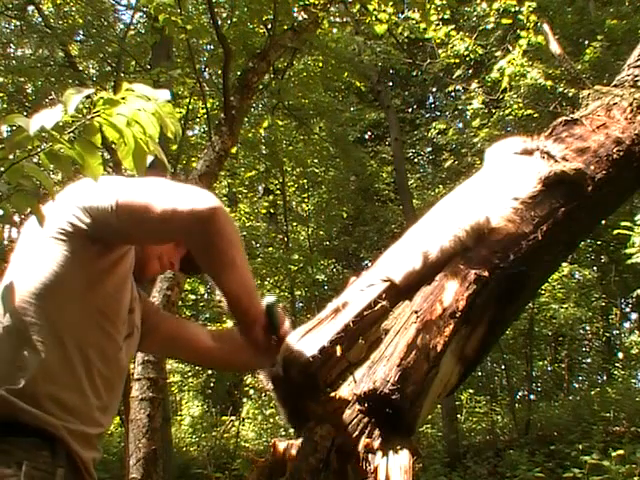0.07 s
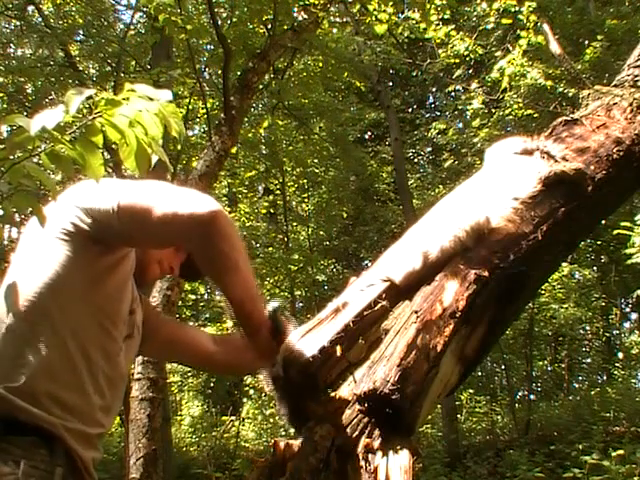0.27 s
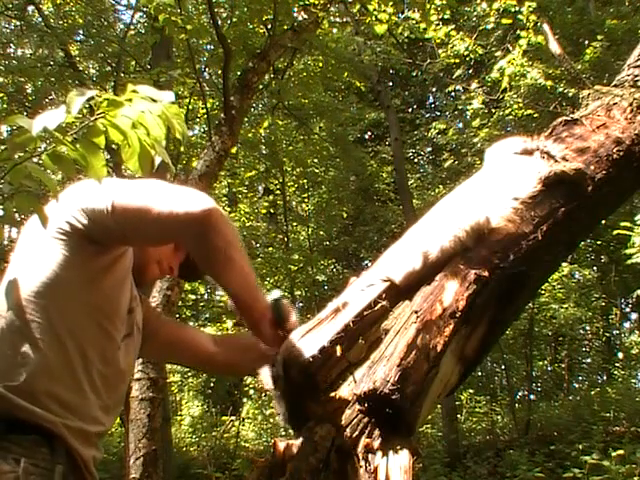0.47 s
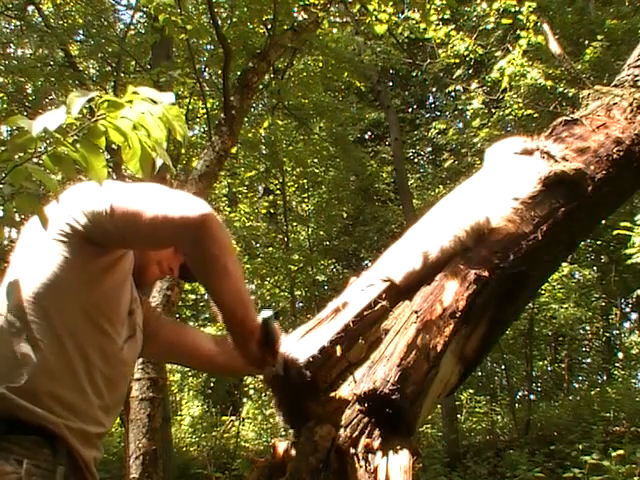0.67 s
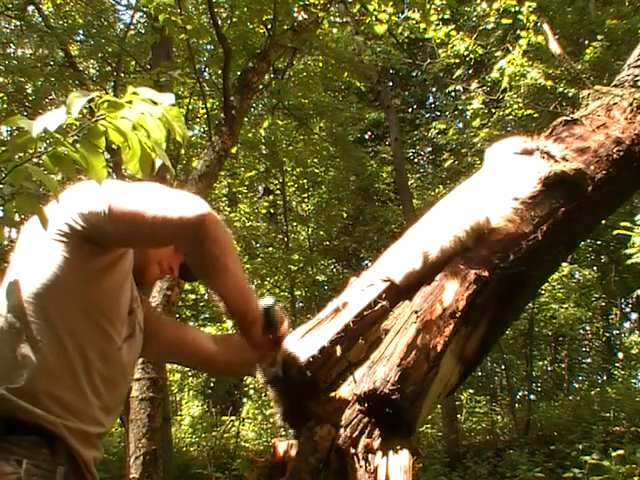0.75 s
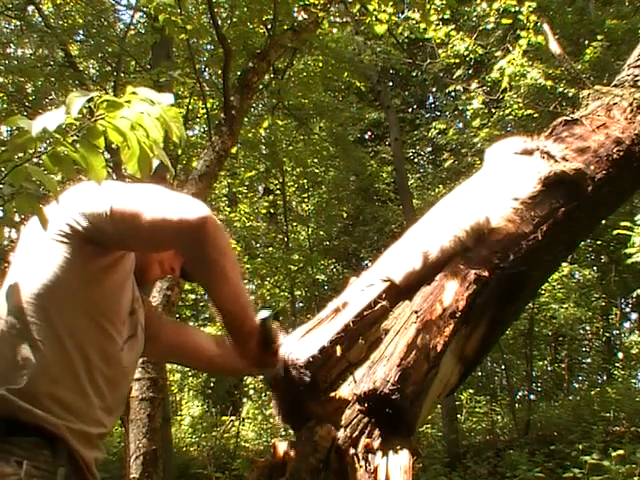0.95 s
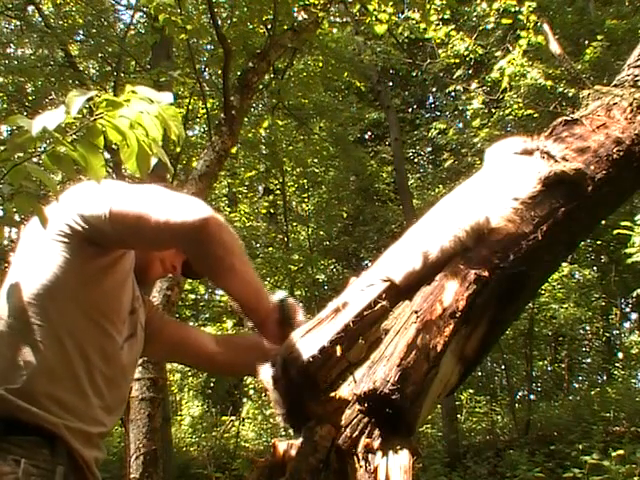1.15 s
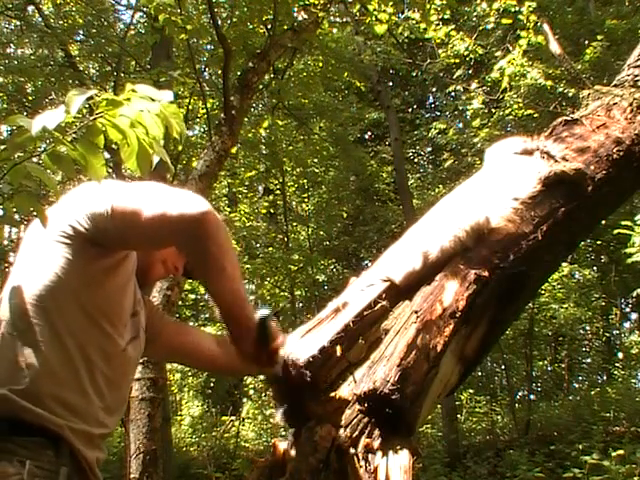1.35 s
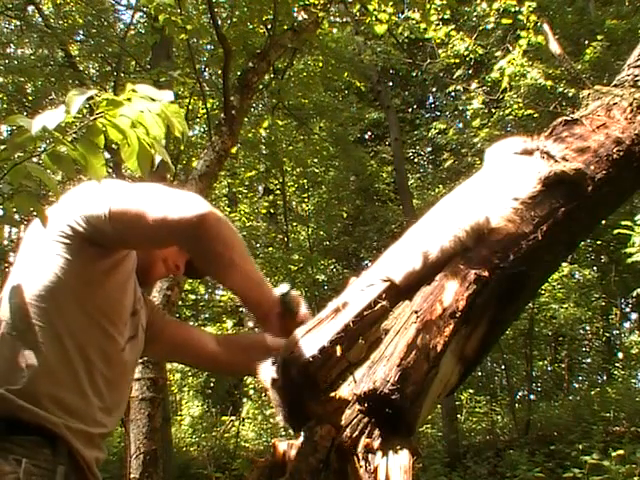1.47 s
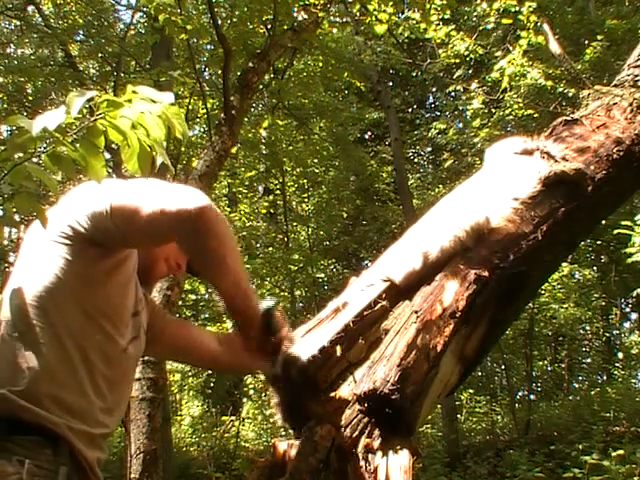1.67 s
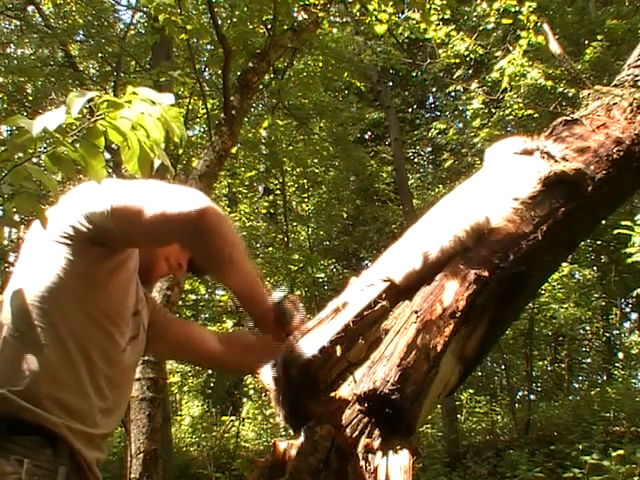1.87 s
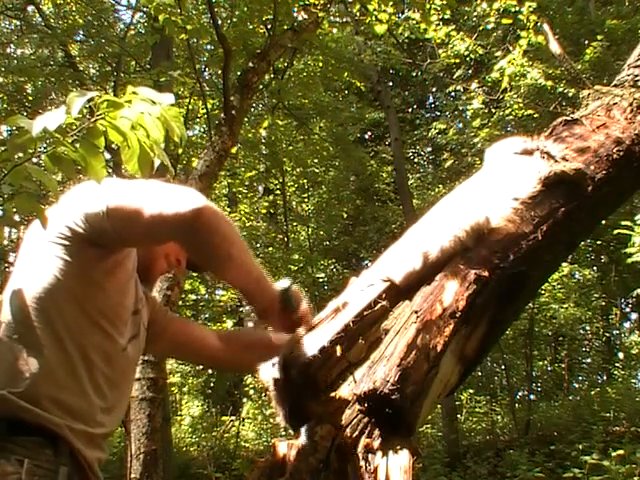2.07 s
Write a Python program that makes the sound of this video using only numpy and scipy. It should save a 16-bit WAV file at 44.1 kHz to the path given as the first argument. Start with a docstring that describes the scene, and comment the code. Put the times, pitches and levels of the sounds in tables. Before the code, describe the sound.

A knife scrapes a wet hide over a log, close by: gritty, hissing strokes of about 0.15 seconds at 0.17, 0.5, 0.8, 1.14, 1.45 and 1.78, with a seventh starting at 2.06. The fourth squeaks briefly near 1.18. A fly buzzes up around 0.45 and knocks the microphone sharply at 0.47, then faintly. A small bird chips throughout with blurred echo over soft forest and insect hiss.

```python
"""In a forest, a knife scrapes a wet hide over a log in seven short strokes, close to one small microphone.
Each stroke is a dense grain of random catches ringing log, hide and blade, plus a wet hiss; the fourth also squeaks.
A small bird chips overhead in arched harmonic tones with a blurred echo, and faint tones sound further off.
A fly buzzes up in wing-beat harmonics, whir and dry ticks, and taps the grille three times, the last faintly.
Leaves and far insects lie behind as a smooth shaped hiss."""
import sys
import numpy as np
from scipy import signal
from scipy.fft import rfft, irfft
from scipy.io import wavfile
from scipy.ndimage import uniform_filter1d

SR = 44100
rng = np.random.default_rng(int(sys.argv[2]) if len(sys.argv) > 2 else 0)


def pcm_store(signal):
    """Save signal as 16-bit PCM."""
    levels = np.round(np.clip(np.atleast_2d(signal), -1, 1) * 32767)
    wavfile.write(sys.argv[1], SR, levels.astype(np.int16).T)


def voltage_ratio(decibels):
    """Convert decibels (scalar or array-like) to amplitude ratios, 20 dB per decade."""
    exponent = np.asarray(decibels, float) / 20
    return 10 ** exponent


N = 92610
T = np.arange(N) / SR

# spectrum of the leaves and far insects: [pitch_hz, level_db per Hz]
FOREST_SPECTRUM = [(24, -62), (40, -15), (54, -31), (150, -20.5), (427, -6), (1020, -1.5), (2640, -8.5),
                   (5860, -8.5), (7160, -9.5), (11800, -13), (15500, -26.5)]
# faint soft tones from further off: [middle_s, length_s, pitch_hz, level_db]
FAR_TONES = [(1.065, 0.032, 800, -51.5), (1.8, 0.036, 5800, -60), (1.305, .03, 2600, -59.5)]
# bird chips: [middle_s, length_s, top_pitch_hz, level_db, second_partial_db]
BIRD_CHIPS = [(0.134, 0.043, 2505, -47.5, -6), (0.236, 0.034, 2470, -47, -7),
              (0.418, 0.044, 2516, -50.5, -1.5), (0.588, 0.038, 2430, -50, -1),
              (0.761, 0.038, 2500, -48, -5), (1.07, 0.038, 2410, -52.5, -2), (1.375, 0.049, 2383, -55, -3),
              (1.463, 0.042, 2440, -54, 1), (1.626, 0.05, 2467, -50.5, 0), (1.786, 0.036, 2288, -50, -6.5),
              (1.928, .04, 2180, -55.5, -1), (2.049, 0.03, 2290, -52, -0.5)]
# the other partials of every chip: [multiple, level_db]
CHIP_HARMONICS = [(1, -14.5), (3, -2.5), (4, -11.5), (5, -22)]
# path of the fly: [start_s, wing_beat_hz, buzz_db, wing_tick_db, tilt_db per multiple]
FLY_PATH = [(.25, 195, -97, -80, -8), (.274, 190.4, -67, -77, -6.5), (.326, 186.8, -66.5, -60, 0),
            (.394, 185.5, -66, -57, 2.93), (.414, 187.4, -56, -60, 1.2), (.434, 183, -43, -45, 0.5),
            (0.449, 186.5, -29, -38, 0.06), (0.459, 187.7, -33.5, -39.5, 0.6),
            (0.473, 191.9, -33, -40, -0.64), (0.483, 191.3, -46, -44, 0.8), (0.49, 197, -49, -61, -1.5),
            (0.501, 193, -57.5, -81, -3), (.508, 196, -92, -90, -7)]
# harmonics of the wing beat: [multiple, level_db]
WING_HARMONICS = [(1, -6.5), (2, 3), (3, 2.5), (4, -5), (5, -2.5), (6, -8.5), (7, -10), (8, -10.5),
                  (9, -17.5), (10, -18), (11, -25), (12, -25)]
# the fly hits the grille: [start_s, peak_db]
GRILLE_TAPS = [(0.4706, -9.5), (0.4752, -10), (0.4877, -23.5)]
# ringing modes of the grille: [pitch_hz, level_db, t60_s]
GRILLE_MODES = [(1480, -2, 0.001), (5060, -2.5, 0.00064), (7400, -4, 0.00062), (10570, -1, 0.0021),
                (13100, -8, .0015)]
# knife strokes, one list each: [start_s, log_ring_db, hide_ring_db, blade_ring_db, hiss_db]
KNIFE_STROKES = [
    [(0.17, -71, -75, -75, -59), (0.182, -55, -73, -64, -66), (0.196, -57, -55.5, -57, -53),
     (0.226, -43.5, -57, -51.5, -50), (0.242, -48.5, -57, -58, -50.5), (0.274, -54.5, -57, -59, -52),
     (0.304, -62, -63, -75, -57), (0.31, -60, -72, -65, -64)],
    [(0.495, -59, -61, -71, -65), (0.511, -55.5, -52, -66, -56), (0.517, -51.5, -56, -55, -61),
     (0.535, -46.5, -53.5, -55, -45.5), (0.573, -52.5, -50.5, -52, -49.5), (0.591, -59, -67, -64, -56),
     (0.611, -60, -63, -69, -59), (0.62, -58, -75, -74, -65)],
    [(0.8, -58, -66, -74, -63), (0.806, -64, -65, -75, -72), (0.842, -45.5, -66, -58, -58),
     (0.86, -51, -47, -52, -47), (0.926, -54, -52.5, -53.5, -46.5), (0.944, -68, -63, -78, -61),
     (0.952, -52, -75, -68, -71), (0.96, -57, -66, -64, -72)],
    [(1.14, -60, -65, -73, -74), (1.148, -54, -67, -75, -74), (1.166, -47.5, -46.5, -52, -50),
     (1.186, -47.5, -45, -49.5, -47.5), (1.244, -49, -49.5, -49, -44), (1.266, -66, -55, -57, -53),
     (1.286, -61, -61, -58, -73), (1.32, -66, -63, -61, -66)],
    [(1.45, -67, -74, -68, -72), (1.462, -57.5, -62, -70, -60), (1.492, -47, -54, -58, -63),
     (1.516, -48.5, -49, -52, -48), (1.536, -48.5, -64, -53, -54), (1.544, -53, -48, -51.5, -49),
     (1.562, -46.5, -53.5, -52.5, -52), (1.6, -71, -62, -64, -60)],
    [(1.775, -63, -75, -61, -61), (1.781, -66, -69, -61, -61), (1.797, -57.5, -45, -51, -57),
     (1.815, -46, -54, -53, -51), (1.877, -52.5, -50.5, -52.5, -49), (1.899, -66, -63, -60, -58),
     (1.913, -53.5, -65, -65, -65), (1.92, -64, -74, -66, -61)],
    [(2.06, -74, -73, -67, -64), (2.068, -59, -63, -72, -63), (2.078, -77, -72, -69, -67),
     (2.088, -53, -59, -59, -68), (2.1, -60, -57, -55, -66)],
]
# resonances of log, hide and blade: [pitch_hz, width_hz, level_db]
LOG_MODES = [(600, 100, -25.5), (1033, 270, 6.5), (1212, 420, 7)]
HIDE_MODES = [(1610, 340, 1), (2177, 500, 2.5)]
BLADE_MODES = [(3110, 630, 2.5), (3840, 1080, 1.5)]
# spectrum of the wet hiss: [pitch_hz, level_db per Hz]
HISS_SPECTRUM = [(2500, -34), (4000, -6.5), (5800, -5.5), (7700, -1.5), (10000, -5), (12800, -5),
                 (15500, -25)]
# the single squeak of the wet hide: [start_s, pitch_hz, level_db]
HIDE_SQUEAK = [(1.16, 1324, -56), (1.168, 1716, -50), (1.174, 2326, -51), (1.184, 2326, -44),
               (1.191, 2047, -43), (1.195, 1650, -45.5), (1.2, 1410, -77)]


def unit(x):
    """Scale to rms 1."""
    return x / np.sqrt(np.mean(x ** 2))


def colour(x, table):
    """Shape the spectrum through (Hz, dB) points on a log frequency axis, then scale to rms 1."""
    hz, db = np.array(table, float).T
    f = np.maximum(np.fft.rfftfreq(N, 1 / SR), 1)
    gain = voltage_ratio(np.interp(np.log(f), np.log(hz), db))
    return unit(irfft(rfft(x) * gain, N))


def ring(x, hz, width_hz):
    """One resonance: a peak filter that rings longer the narrower it is."""
    return signal.lfilter(*signal.iirpeak(hz, hz / width_hz, SR), x)


def walk(rate_hz):
    """Random wander: normal levels held 1 / rate_hz seconds and slewed twice."""
    hold = int(SR / rate_hz)
    steps = np.repeat(rng.standard_normal(N // hold + 1), hold)
    return 1.48 * uniform_filter1d(uniform_filter1d(steps, hold), hold)[:N]


def curve(s, db):
    """Gain drawn through dB points, silent before the first and after the last."""
    return voltage_ratio(np.interp(T, s, db, left=-200, right=-200))


def forest():
    """Leaves and far insects: a smooth hiss that swells a little."""
    level_db, swell_db = -52.5, 0.5
    return voltage_ratio(level_db + swell_db * walk(4.6)) * colour(rng.standard_normal(N), FOREST_SPECTRUM)


def far_tones():
    """Faint brief sine tones from further off, each with a bell-shaped fade in and out."""
    out = np.zeros(N)
    for middle, length, hz, db in FAR_TONES:
        bell = np.exp(-(2 * (T - middle) / length) ** 2)
        out += voltage_ratio(db) * np.sqrt(2) * bell * np.sin(2 * np.pi * hz * T)
    return out


def bird():
    """Short nasal chips whose pitch arches; the trees give back a blurred echo."""
    arch, rough_db = 0.07, 3.0  # arch: fractional pitch drop one unit of u from the top
    echo_decay_s, echo_db = 0.025, -7
    out, wobble = np.zeros(N), 1 + 0.009 * walk(500)
    for middle, length, hz, db, second_db in BIRD_CHIPS:
        u = np.clip((T - middle) / length * 2, -1, 1)  # -1 at the start, 1 at the end
        pitch = hz * (1 - arch * (u + 0.1) ** 2) * wobble
        phase = 2 * np.pi * np.cumsum(pitch) / SR
        partials = CHIP_HARMONICS + [(2, second_db)]
        tone = sum(voltage_ratio(d) * np.sin(round(k) * phase) for k, d in partials)
        fade = np.clip((1 + u) / 0.4, 0, 1) * np.clip((1 - u) / 0.5, 0, 1)
        out += voltage_ratio(db) * fade * tone
    out *= voltage_ratio(rough_db * walk(250))
    tail_n = np.arange(4096)
    tail = rng.standard_normal(4096) * np.exp(-tail_n / SR / echo_decay_s)
    echo = signal.fftconvolve(out, tail / np.linalg.norm(tail))[:N]
    return out + voltage_ratio(echo_db) * echo


def wing_puff(beats, tilt):
    """One air puff per wing beat, summed from harmonics that wander in level and phase."""
    puff_share = 0.64  # place of the puff within a beat
    uneven_db, smear_rad, wander_rad = 3, 0.07, 0.53
    phase = 2 * np.pi * (beats - puff_share)
    out = np.zeros(N)
    for k, db in WING_HARMONICS:
        gain = voltage_ratio(db + tilt * (k - 2.5) + uneven_db * walk(109.95))
        shift = wander_rad * walk(80.63) - smear_rad * (k - 3) ** 2
        out -= gain * np.cos(round(k) * phase + shift)
    return out


def wing_tick(beats):
    """Dry noise tick at each turn of the wing, two per beat, rung around one broad treble peak."""
    upstroke_share, decay_beats = 0.57, 0.12
    hz, width_hz = 9070, 5400
    gate = np.exp(-(beats % 1) / decay_beats) + np.exp(-((beats - upstroke_share) % 1) / decay_beats)
    tick = (gate + 0.1) * voltage_ratio(3.7 * walk(350)) * rng.standard_normal(N)
    return unit(ring(ring(tick, hz, width_hz), hz, 2 * width_hz))


def grille_taps():
    """The fly hits the grille: its modes ring briefly as decaying sines."""
    out = np.zeros(N)
    for start, peak_db in GRILLE_TAPS:
        u = np.maximum(T - start, 0)
        hit = sum(voltage_ratio(d) * np.exp(-np.log(1000) * u / t60) * np.sin(2 * np.pi * f * u)
                  for f, d, t60 in GRILLE_MODES)
        out += voltage_ratio(peak_db) * hit / abs(hit).max()
    return out


def fly():
    """Air puffs, whirring air and wing ticks follow the fly's path; its taps ring the grille."""
    downstroke_s, whir_db = 0.4459, -6.5
    s, hz, buzz_db, tick_db, tilt_db = np.array(FLY_PATH).T
    beats = np.cumsum(np.interp(T, s, hz)) / SR
    beats = beats - np.interp(downstroke_s, T, beats)  # whole numbers are downstrokes
    puff = wing_puff(beats, np.interp(T, s, tilt_db))
    whir = voltage_ratio(whir_db) * unit(ring(ring(rng.standard_normal(N), 910, 1000), 910, 1500))
    buzz = (puff + whir) * curve(s, buzz_db)
    return buzz + wing_tick(beats) * curve(s, tick_db) + grille_taps()


def catches():
    """The edge catches and slips on fibres: dense clicks of random size and sign over noise."""
    catches_per_s, spread_db = 3000, 3.5
    on = rng.random(N) < catches_per_s / SR
    size = voltage_ratio(spread_db * np.minimum(rng.exponential(size=N), 3.5))
    return on * size * rng.choice([-1, 1], N) + 0.63 * rng.standard_normal(N)


def body_ring(grain, modes):
    """One body rung by the grain, each mode filtered twice for steeper skirts."""
    return unit(sum(voltage_ratio(db) * unit(ring(ring(grain, hz, w), hz, w)) for hz, w, db in modes))


def stroke_fade(t0, t1):
    """Short rise and fall centred on the ends of a stroke."""
    attack_s, release_s = 0.022, 0.013
    return np.clip(np.minimum((T - t0) / attack_s, (t1 - T) / release_s) + 0.5, 0, 1)


def squeak():
    """The wet hide squeaks once: a gliding, wavering tone and its octave, both rough in level."""
    octave_db, rough_db = 1, 2.5
    s, hz, db = np.array(HIDE_SQUEAK).T
    pitch = np.interp(T, s, hz) * (1 + 0.015 * walk(600))
    phase = 2 * np.pi * np.cumsum(pitch) / SR
    low = voltage_ratio(rough_db * walk(400)) * np.sin(phase)
    octave = voltage_ratio(octave_db + rough_db * walk(400)) * np.sin(2 * phase)
    return np.sqrt(2) * curve(s, db) * (low + octave)


def knife():
    """One grain of catches rings log, hide and blade; a wet hiss from its own grain runs alongside."""
    grain = catches()
    shared, out = walk(120), np.zeros(N)
    layers = [body_ring(grain, modes) for modes in (LOG_MODES, HIDE_MODES, BLADE_MODES)]
    layers.append(colour(catches(), HISS_SPECTRUM))
    for column, layer in enumerate(layers, 1):
        patchy = unit(layer * voltage_ratio(0.23 * shared + 0.65 * walk(90)))  # wander in dB
        for stroke in map(np.array, KNIFE_STROKES):
            s = stroke[:, 0]
            level = voltage_ratio(np.interp(T, s, stroke[:, column]))
            out += patchy * stroke_fade(s[0], s[-1]) * level
    return out + squeak()


def scene():
    """One microphone feeds both channels."""
    return np.tile(knife() + bird() + far_tones() + fly() + forest(), (2, 1))


def top_cut(x):
    """Nothing passes above the cut-off."""
    return signal.sosfilt(signal.butter(12, 15790, fs=SR, output="sos"), x)


def record(dry):
    """The small microphone loses the deep bass: a gentle first-order low cut at 110 Hz."""
    low_cut = signal.butter(1, 110, "high", fs=SR, output="sos")
    mix = signal.sosfilt(low_cut, dry)
    return top_cut(mix)


dry = scene()
out = record(dry)
pcm_store(out)
```